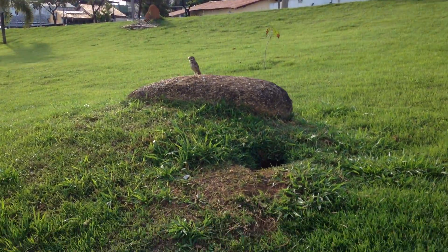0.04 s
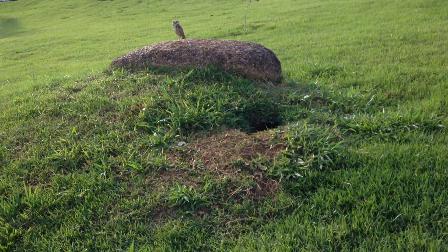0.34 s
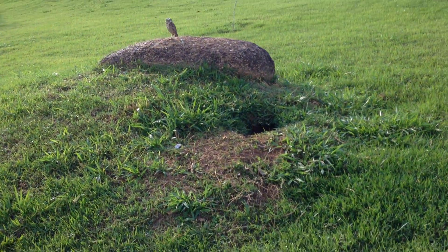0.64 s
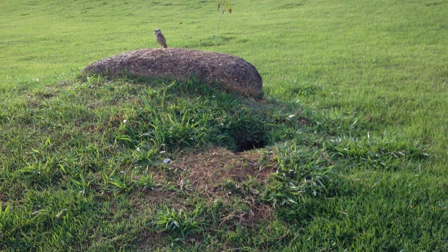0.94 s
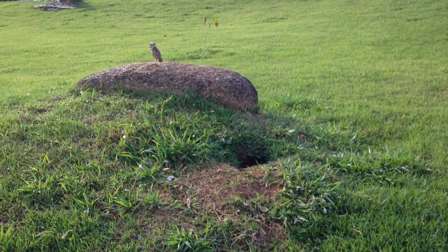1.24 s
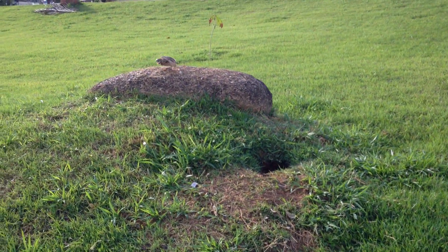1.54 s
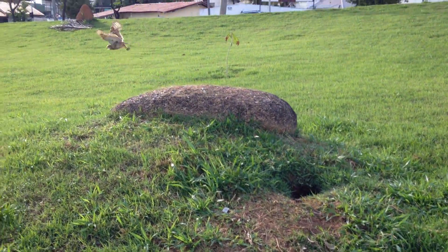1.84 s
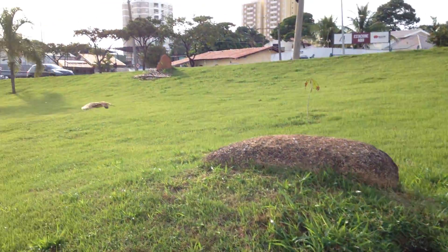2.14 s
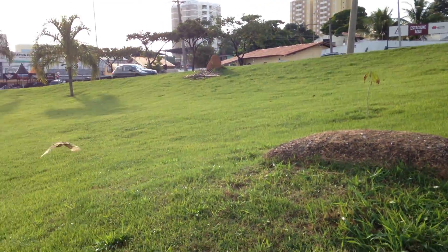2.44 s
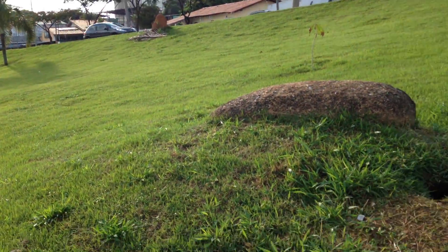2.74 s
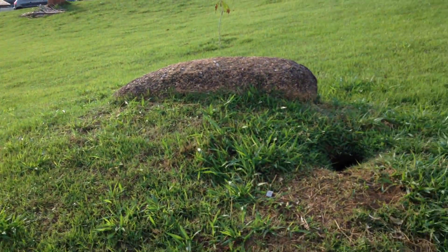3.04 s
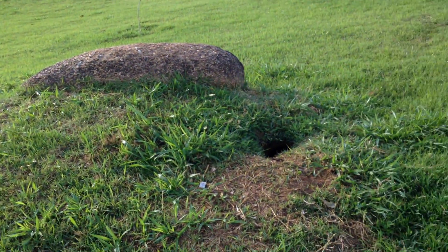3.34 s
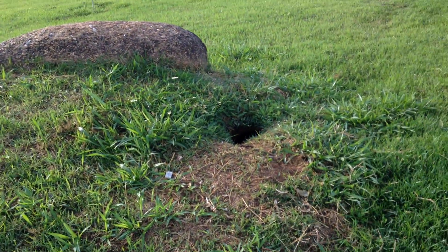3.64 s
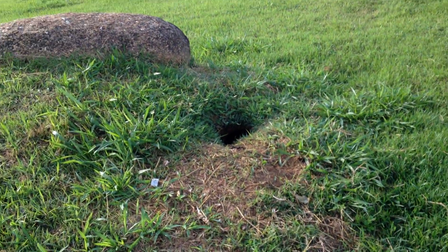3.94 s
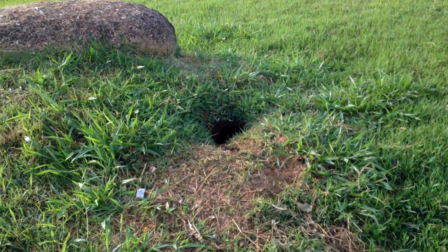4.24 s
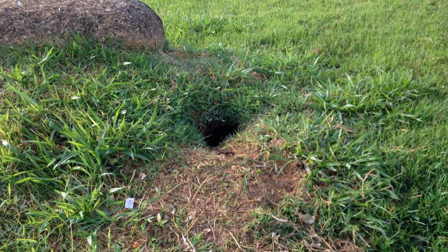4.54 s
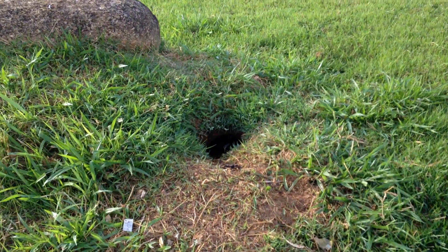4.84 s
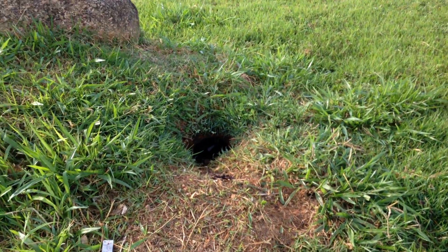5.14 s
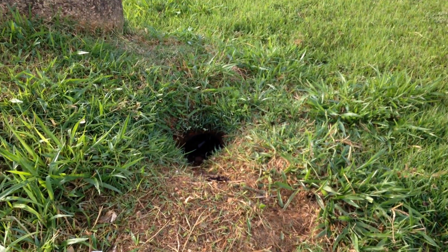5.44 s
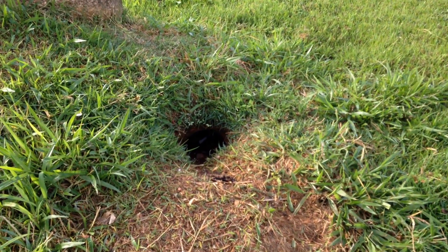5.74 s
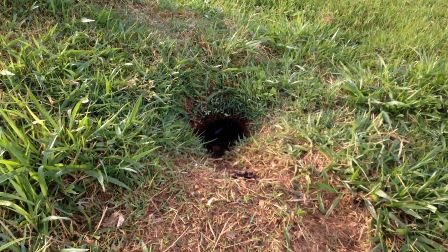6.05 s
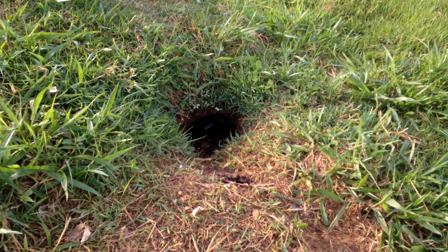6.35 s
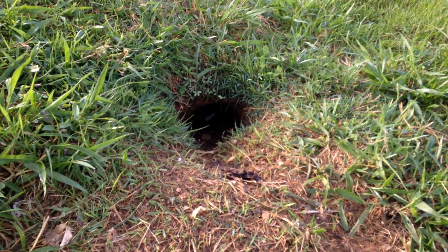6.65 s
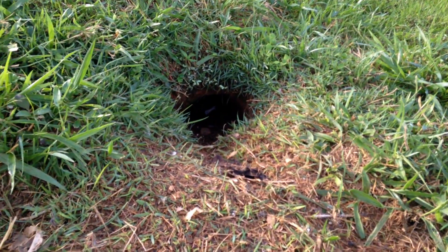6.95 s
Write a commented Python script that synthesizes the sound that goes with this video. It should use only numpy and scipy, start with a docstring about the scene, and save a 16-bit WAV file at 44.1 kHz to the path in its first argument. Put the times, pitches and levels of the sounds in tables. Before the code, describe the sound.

An owl gives one harsh screech and three sharp barks over faint distant traffic, small birds and soft steps in grass.

```python
"""Burrowing owl on a town lawn.

The owl gives one harsh screech, then three sharp barks. Each call swoops up and breaks into a high
register: a harmonic tone from one side of the syrinx, roughened by the other side and by torn air.
Houses return faint echoes. Small birds whistle far off, engines hum and tyres hiss on a nearby road,
and grass rustles under slow steps."""
import sys
import numpy as np
from scipy import signal
from scipy.fft import rfft, irfft
from scipy.io import wavfile
from scipy.ndimage import map_coordinates

SR = 44100
rng = np.random.default_rng(int(sys.argv[2]) if len(sys.argv) > 2 else 0)


def wrap_up_sound(samples):
    """Save the sound to the file named by the first command line argument, as 16-bit audio."""
    columns = np.atleast_2d(samples).T
    # keep every value between -1 and 1, then stretch to whole-number steps
    tamed = np.clip(columns, -1, 1)
    steps = np.round(tamed * 32767).astype(np.int16)
    wavfile.write(sys.argv[1], SR, steps)


N = 313551
T = np.arange(N) / SR

# Traffic swell. Each row: time in seconds, rumble and tyre levels in dB before their trims.
ROAD_LEVELS = [(0, -51.5, -66), (1.8, -52.5, -64), (3.9, -51.5, -61.5), (4.5, -48.5, -60.5),
               (5.2, -47.5, -59), (7.11, -49, -66)]
# Noise spectra. Each row: frequency in Hz, relative level in dB.
RUMBLE_SPECTRUM = [(20, -22), (38, -21), (50, -6.5), (80, 2), (130, -1), (180, -9.5), (250, -15),
                   (310, -15), (400, -22), (800, -43), (2000, -56)]
TYRE_SPECTRUM = [(150, -5.5), (400, -4), (800, 1.5), (980, 0.5), (1110, 0.5), (1300, -2), (2000, -4),
                 (3000, -16.5), (5000, -28.5), (9000, -30.5), (15000, -47)]
AIR_SPECTRUM = [(200, -11), (1500, 4.5), (3500, -1.5), (5500, -7.5), (8000, -12.5), (11000, -20),
                (15000, -18.5)]
GRASS_SPECTRUM = [(500, 12), (3000, -1), (6000, -2.5), (9000, -8.5), (12000, -12), (15000, -19)]
FLOCK_SPECTRUM = [(1500, -23.5), (2600, -1), (3100, -1), (4400, -4), (5200, -20.5), (9000, -39.5)]
RASP_SPECTRUM = [(600, -29), (1700, -20.5), (2400, -28.5), (3400, -3), (4250, 0), (4950, -8.5), (5550, 0),
                 (6200, -12), (7250, -5.5), (8600, -23), (9700, -16), (11000, -27.5), (15000, -36.5)]
# Main engine harmonics. Each row: order, relative level in dB.
ENGINE_HARMONICS = [(1, 1.5), (2, -7), (3, -12), (4, -23), (5, -28.5), (6, -25.5)]
# Level curves. Each row: time in seconds, base level in dB.
ENGINE_LEVELS = [(0, -53.5), (1, -54), (2.2, -52), (3, -51), (3.85, -52.5), (4, -48), (4.7, -56),
                 (5.5, -50.5), (6.1, -54), (6.4, -49.5)]
FLOCK_LEVELS = [(0, -63), (.25, -69.5), (.7, -73), (1.1, -93), (1.5, -100)]
# Two more engines. Each row: start and end in seconds, first and last pitch in Hz, level in dB.
ENGINE_DRONES = [(4, 7.4, 112.4, 115, -50.5), (-0.54, 5.8, 149, 123, -61)]
# Steps in grass. Each row: centre and half length in seconds, level in dB.
GRASS_STEPS = [(.08, 0.1, -65), (1.134, 0.054, -63.5), (3.208, 0.13, -65.5), (3.417, 0.045, -69.5),
               (3.92, 0.31, -65.5), (4.966, 0.068, -58.5), (5.302, .06, -67.5), (5.56, 0.056, -66),
               (5.971, .07, -65)]
# Dry stems. Each row: start in seconds, level in dB, centre in Hz, width in octaves.
STEM_SNAPS = [(1.112, -64, 3000, 1.2), (5.533, -64, 6440, .6), (6.552, -58.5, 5460, 0.96),
              (6.92, -61, 6400, 0.23)]
# Far birds. Each row: start and length in seconds, first, middle and last pitch in Hz, base level in dB,
# waver as a share of pitch.
BIRD_WHISTLES = [(.27, 0.12, 4500, 5650, 6300, -73, .008), (.41, 0.11, 4050, 3840, 3830, -61.5, .028),
                 (.51, .06, 6900, 6400, 5800, -76, .012), (0.616, .08, 4900, 4430, 4150, -67, .028),
                 (0.564, 0.052, 1170, 1244, 1430, -58, .035), (0.608, .18, 1420, 1390, 1300, -65.5, .028),
                 (0.759, 0.054, 2840, 3530, 4450, -60.5, .06), (0.801, .033, 2040, 2430, 2540, -57, .028),
                 (0.821, .03, 4100, 3100, 2680, -59.5, 0.054), (.849, 0.031, 2675, 2444, 2320, -49, 0.034),
                 (1.945, .11, 4800, 5750, 6450, -73, 0.0067), (3.389, .05, 3606, 3920, 4220, -68.5, .015),
                 (3.765, .14, 4400, 5850, 6100, -69, .008), (4.17, .03, 3930, 3500, 3000, -70, .028),
                 (5.628, .06, 2810, 3570, 4370, -62, .04), (5.692, .042, 3100, 2680, 2280, -52, .035),
                 (5.728, .036, 2280, 2020, 1950, -59.5, .03), (6.241, .035, 3500, 3950, 3400, -70, .02),
                 (6.305, 0.084, 5000, 5220, 5430, -74.5, 0.0083),
                 (6.986, 0.082, 4600, 4030, 3850, -71.5, .012),
                 (7.052, 0.045, 1785, 2360, 1950, -55, 0.022)]
# House fronts. Each row: delay in seconds, gain in dB on top of the path response.
HOUSE_ECHOES = [(.037, -41.5), (.085, -34), (0.119, -47), (.225, -36), (0.764, -32.5)]
# Responses of the echo path and of throat plus beak. Each row: frequency in Hz, gain in dB.
ECHO_RESPONSE = [(800, -10.5), (3200, -5), (3800, -12.5), (4900, 0.5), (6600, -2.5), (9000, -11.5),
                 (15000, -27)]
SCREECH_RESPONSE = [(600, -11.5), (1100, -11.5), (1600, -18.5), (1900, -11.5), (2500, -1), (3200, -3.5),
                    (3800, -1), (4800, -15.5), (5700, -17.5), (6500, -20.5), (8000, -22.5), (9400, -24.5),
                    (11300, -35.5), (15000, -40)]
BARK_RESPONSE = [(600, 14), (1050, 5), (1600, -19), (2100, 11), (3200, 1.5), (4200, 7), (4900, -4),
                 (6500, -14.5), (8100, -26), (9800, -44), (15000, -60)]
# High register of the screech. Each row: time in seconds, pitch in Hz.
SCREECH_CONTOUR = [(1.487, 1740), (1.499, 1878), (1.56, 1883), (1.648, 1919), (1.688, 1791), (1.728, 1584),
                   (1.785, 1620), (1.865, 1533), (1.93, 1384)]
# Surges of its clear tone. Each row: centre and half length in seconds, level in dB.
SCREECH_SURGES = [(1.503, 0.021, -17), (1.598, 0.021, -24), (1.662, 0.012, -31), (1.747, 0.029, -29),
                  (1.842, .026, -32.5)]
# Second side of the syrinx. Each row: time in seconds, pitch ratio to the first, share of rasp power.
SCREECH_SECOND_SIDE = [(1.545, 0.87, .25), (1.568, 0.83, 0.78), (1.605, .92, 0.73), (1.635, 0.99, .33),
                       (1.7, 0.89, 0.38), (1.76, 1.11, 0.28)]
# Barks. Each row: register break and length in seconds, base pitch in Hz, sag exponent, base level in dB,
# attack in dB/s, end fade in dB, rasp re tone in dB, tilt in dB/octave, beak resonance in dB,
# pitch ratio of the second side.
OWL_BARKS = [(2.080, 0.046, 1638, 3.57, -25, 605, -10.5, -12, 2.5, -5.5, 1.12),
             (2.293, 0.049, 1660, 6, -27.5, 800, -7.5, -27, 1, -0.5, 1.21),
             (2.503, .051, 1624, 3.66, -30, 700, -13.5, -14.5, -4, 11, 1.08)]

TOP_HZ = 15300
SWOOP_S, BREAK_S = 0.027, 0.004  # low-register climb, jump to the high register


def undb(db):
    """Decibels to gain."""
    return 10 ** (np.asarray(db) / 20)


def unit(x):
    """Scale to rms 1."""
    return x / np.sqrt(np.mean(x ** 2) + 1e-20)


def ramp(x):
    """Clip to 0..1."""
    return np.clip(x, 0, 1)


def gate(t, start_s, end_s, edge_s):
    """Window with linear edges."""
    return ramp(np.minimum(t - start_s, end_s - t) / edge_s)


def curves(table, t):
    """Table columns interpolated in time."""
    times_s, *columns = np.transpose(table)
    return [np.interp(t, times_s, column) for column in columns]


def response(points, hz):
    """Gain of a (Hz, dB) curve at hz."""
    f, db = np.transpose(points)
    return undb(np.interp(np.log(np.maximum(hz, 1)), np.log(f), db))


def shape(x, points):
    """Filter by a (Hz, dB) curve."""
    return irfft(rfft(x) * response(points, np.fft.rfftfreq(len(x), 1 / SR)), len(x))


def noise(points, size=N):
    """Shaped noise, rms 1."""
    return unit(shape(rng.standard_normal(size), points))


def walk(rate_hz, size=N):
    """Random drift below about rate_hz, rms 1."""
    f = np.fft.rfftfreq(size, 1 / SR)
    return unit(irfft(rfft(rng.standard_normal(size)) / (1 + (f / rate_hz) ** 4), size))


def phase_of(hz):
    """Running phase in radians."""
    return 2 * np.pi * np.cumsum(hz) / SR


def road():
    """Passing traffic: rumble, tyre hiss and a slowly rising whine, over the hiss of open air."""
    rumble_db, tyre_db = curves(ROAD_LEVELS, T)
    rumble = noise(RUMBLE_SPECTRUM) * undb(rumble_db - 2.5 + walk(3.6))
    tyres = noise(TYRE_SPECTRUM) * undb(tyre_db + 2 + 0.5 * walk(7.1))
    phase = phase_of(1097 + 6 * (T - 2.4))
    whine = np.sin(phase) * walk(28) + np.cos(phase) * walk(28)
    whine *= undb(-68) * gate(T, 2.4, 6.9, edge_s=0.21)
    air = noise(AIR_SPECTRUM) * undb(-66.5 + 0.5 * walk(3.9))
    return rumble + tyres + whine + air


def engines():
    """Distant exhausts, low orders only: one speeds up and levels off, two more drone."""
    start_hz, top_hz, settle_s = 48.46, 58.45, 2.45
    hz = top_hz + (start_hz - top_hz) * np.exp(-T / settle_s)
    phase = phase_of(hz * (1 + 0.004 * walk(3.74)))
    level_db = curves(ENGINE_LEVELS, T)[0]
    load_db = 0.85 * (T - T.mean())  # upper orders grow as it works harder
    out = np.zeros(N)
    for order, order_db in ENGINE_HARMONICS:
        drift_db = 0.63 * walk(2.5) if order == 1 else load_db + 1.9 * walk(2)
        out += undb(level_db + order_db + drift_db) * np.sin(order * phase)
    for start_s, end_s, first_hz, last_hz, db in ENGINE_DRONES:
        hz = np.interp(T, [start_s, end_s], [first_hz, last_hz]) * (1 + 0.0054 * walk(2.93))
        out += undb(db + 0.76 * walk(3.2)) * gate(T, start_s, end_s, edge_s=0.21) * np.sin(phase_of(hz))
    return np.sqrt(2) * out


def grass():
    """Blades brush in grainy swishes; a few dry stems snap."""
    swish = sum(undb(db) * np.exp(-((T - at_s) / half_s) ** 2) for at_s, half_s, db in GRASS_STEPS)
    grains = rng.standard_normal(N) * undb(2 * rng.exponential(size=N))
    out = unit(shape(grains, GRASS_SPECTRUM)) * swish * undb(1.2 * walk(40))
    f = np.geomspace(200, 16000, 30)
    for start_s, db, centre_hz, octaves in STEM_SNAPS:
        band_db = -10 * np.log10(1 + (np.log2(f / centre_hz) / octaves) ** 4)
        snap = noise(np.column_stack([f, band_db]), size=1024) * np.exp(-T[:1024] / 0.003)
        out[int(start_s * SR):][:len(snap)] += undb(db) * snap
    return out


def scatter(x, t60_s, wet_db):
    """Diffuse tail off trees and walls."""
    t = T[:int(1.5 * SR)]
    tail = noise([(500, -4.5), (3000, -5), (5000, 3), (7000, -3), (14000, -10)], len(t))
    tail *= undb(-60 * t / t60_s) * ramp(t / 0.02)
    return undb(wet_db) * signal.fftconvolve(x, tail / np.sqrt(np.sum(tail ** 2)))[:N]


def echoes(x):
    """Distinct returns from house fronts."""
    far = shape(x, ECHO_RESPONSE)
    return sum(undb(db) * np.pad(far, (int(delay_s * SR), 0))[:N] for delay_s, db in HOUSE_ECHOES)


def far_birds():
    """Gliding, wavering whistles blurred by distance; a haze of twitter at the start."""
    out, tremble = np.zeros(N), walk(450)
    for start_s, length_s, first_hz, middle_hz, last_hz, db, waver in BIRD_WHISTLES:
        end_s = start_s + length_s
        on = (T > start_s) & (T < end_s)
        position = 2 * (T[on] - start_s) / length_s - 1
        hz = np.polyval(np.polyfit([-1, 0, 1], [first_hz, middle_hz, last_hz], 2), position)
        swell = undb(db - 9.5 * position ** 2) * gate(T[on], start_s, end_s, edge_s=0.0025)
        out[on] += np.sin(phase_of(hz * (1 + waver * tremble[on]))) * swell
    out *= undb(4.3 * walk(170) + 0.6)
    flock = noise(FLOCK_SPECTRUM) * undb(curves(FLOCK_LEVELS, T)[0] + 2.5 * walk(14))
    return out + scatter(out, t60_s=0.42, wet_db=-12.5) + flock


def swoop(t, high_hz, attack_db_per_s):
    """Pitch and gain of a call climbing the low register and breaking into high_hz at t = 0."""
    top_hz, octaves_per_s, full_at_s = 1191, 27, 0.007
    low_hz = top_hz * 2 ** (octaves_per_s * np.minimum(t, 0))
    hz = low_hz + (high_hz - low_hz) * ramp(t / BREAK_S + 0.5)
    gain = undb(attack_db_per_s * np.minimum(t - full_at_s, 0)) * ramp(2 * (1 + t / SWOOP_S))
    return hz, gain


def crack(t, decay_s=0.0048):
    """Roughness envelope around a register change at t = 0."""
    return np.exp(-np.abs(t) / decay_s)


def slackness(hz):
    """1 in the slack low register, 0 in the high one."""
    return ramp((1400 - hz) / 300)


def low_register(f, hz, db_per_octave=-4):
    """Gain of an overtone at f for pitch hz: the low register is duller."""
    return undb(db_per_octave * slackness(hz) * np.log2(f / hz))


def torn_air(hz, reference_hz=1841):
    """Rasp bands that slide with the pitch and puff once a cycle."""
    speed = np.clip(hz / reference_hz, 0.72, 1.1)
    air = map_coordinates(noise(RASP_SPECTRUM, 2 * len(hz)), [np.cumsum(speed)], order=3)
    puffs = 1 + 0.27 * np.cos(phase_of(hz))
    return unit(air * puffs * undb(1.2 * walk(150, len(hz))))


def membrane(hz, throat, rolloff_db):
    """One side of the syrinx: nine harmonics under the throat's resonances; overtones flicker."""
    k = np.arange(1, 10)[:, None]
    flicker_db = 3.1 * np.array([walk(35, len(hz)) for _ in k]) * ramp((k - 1) / 4)
    gains = throat(k * hz) * undb(flicker_db - rolloff_db * np.maximum(k - 4, 0)) * (k * hz < TOP_HZ)
    return (gains * np.sin(k * phase_of(hz))).sum(0) / np.sqrt((gains ** 2).sum(0) / 2)


def owl_voice(hz, rasp_ratio, throat, second_ratio, second_share, second_jitter, dull_db=0):
    """Clear tone roughened by the unsteady second side of the syrinx and by torn air."""
    size = len(hz)
    roughness = rasp_ratio / np.sqrt(1 + rasp_ratio ** 2)
    hz = hz * (1 + 0.012 * roughness * walk(650, size) + 0.00065 * walk(60, size))
    rolloff_db = dull_db * roughness + 5.8 * slackness(hz)  # per harmonic above the fourth
    clear = membrane(hz, throat, rolloff_db) * (1 + 0.25 * roughness * walk(350, size))
    second_hz = hz * second_ratio * (1 + second_jitter * walk(590, size))
    second = membrane(second_hz, throat, rolloff_db)
    rough = np.sqrt(second_share) * second + np.sqrt(1 - second_share) * torn_air(hz)
    return clear * np.sqrt(1 - roughness ** 2) + roughness * rough


def screech():
    """Swoop into a piercing note that surges, weakens, turns hoarse and sinks."""
    high_at_s, hoarse_at_s, end_s, release_s = 1.487, 1.511, 1.934, 0.015
    out, on = np.zeros(N), (T > high_at_s - SWOOP_S) & (T < end_s)
    t = T[on]
    hz, attack = swoop(t - high_at_s, curves(SCREECH_CONTOUR, t)[0], attack_db_per_s=1050)
    surge = lambda at_s, half_s, db: undb(db) / np.cosh((t - at_s) / half_s)
    tone = np.sqrt(sum(surge(*row) ** 2 for row in SCREECH_SURGES))
    hoarse = undb(-34 - 11 * (t - hoarse_at_s)) * ramp((t - hoarse_at_s) / 0.03015)
    hoarse *= (tone / undb(-31)) ** 0.26  # partly follows the tone
    hoarse = np.hypot(hoarse, surge(at_s=1.583, half_s=0.011, db=-35))
    rasp = hoarse + undb(-18.5) * crack(t - high_at_s) + undb(-35) * tone
    ratio, share = curves(SCREECH_SECOND_SIDE, t)
    jitter = 0.11 * (1 - share)  # the second side steadies as it takes over
    # Strong surges lift the second harmonic.
    focus = lambda f: (tone / undb(-27)) ** (0.3 * ramp(1 - np.abs(f / hz - 2)))
    throat = lambda f: response(SCREECH_RESPONSE, f) * focus(f) * low_register(f, hz)
    voice = owl_voice(hz, rasp / tone, throat, ratio, share, jitter, dull_db=10.5)
    out[on] = voice * np.hypot(tone, rasp) * attack * ramp((end_s - t) / release_s)
    return out


def bark(high_at_s, length_s, pitch_hz, sag_power, db, attack_db_per_s, fade_db, rasp_db,
         tilt_db_per_octave, beak_db, second_ratio):
    """Swoop, hold, sag, crack back to the low register; the beak colours the third harmonic."""
    tail_s, drop_s, drop_hz, drop_octaves_per_s = 0.016, 0.0061, 1050, 38
    beak_hz, beak_width_hz, release_db_per_s = 5250, 1000, 850
    out, on = np.zeros(N), (T > high_at_s - SWOOP_S) & (T < high_at_s + length_s + tail_s)
    t = T[on] - high_at_s
    sag = ramp(t / length_s) ** sag_power
    dropped = ramp((t - length_s) / drop_s + 0.5)
    after_s = np.maximum(t - length_s, 0)
    scoop = 0.081 * np.exp(-np.abs(t) / 0.005)  # starts flat, then settles
    arch_hz = pitch_hz * (1 - scoop - 0.191 * sag)
    tail_hz = drop_hz * 2 ** (-drop_octaves_per_s * after_s)
    hz, attack = swoop(t, arch_hz + (tail_hz - arch_hz) * dropped, attack_db_per_s)
    swell = undb(-2 * np.exp(-np.abs(t) / 0.0098))
    release = undb(fade_db * sag - 7.5 * dropped - release_db_per_s * after_s)
    rasp = undb(rasp_db) + undb(1) * crack(t) + undb(3) * crack(t - length_s)
    beak = lambda f: undb(beak_db * np.exp(-((f - beak_hz) / beak_width_hz) ** 2))
    tilt = lambda f: undb(tilt_db_per_octave * np.log2(f / beak_hz))
    throat = lambda f: response(BARK_RESPONSE, f) * tilt(f) * beak(f) * low_register(f, hz)
    voice = owl_voice(hz, rasp, throat, second_ratio, second_share=0.55, second_jitter=0.025)
    out[on] = voice * undb(db) * attack * swell * release * ramp((length_s + tail_s - t) / BREAK_S)
    return out


def scene():
    """Close owl, its echoes and the town, in mono."""
    calls = screech() + sum(bark(*row) for row in OWL_BARKS)
    owl = calls + echoes(calls) + scatter(calls, t60_s=1.1, wet_db=-31.5)
    return (owl + far_birds() + engines() + road() + grass())[None]


def record(dry):
    """Steep low-pass at TOP_HZ."""
    return signal.sosfilt(signal.ellip(10, 0.2, 80, TOP_HZ, fs=SR, output="sos"), dry)


dry = scene()
out = record(dry)
wrap_up_sound(out)
```